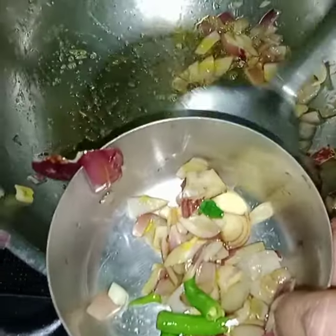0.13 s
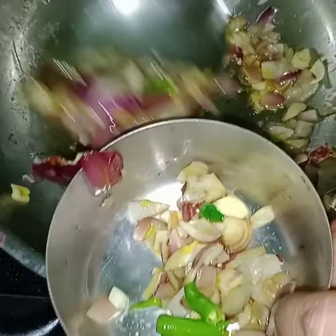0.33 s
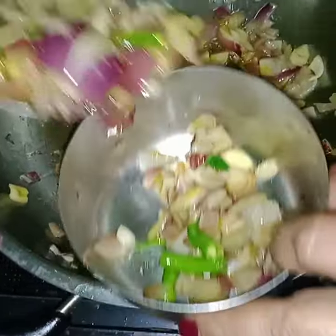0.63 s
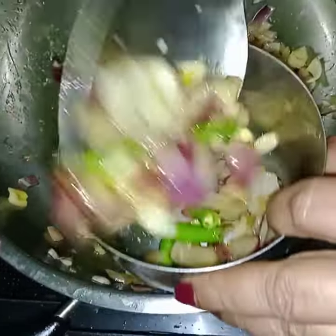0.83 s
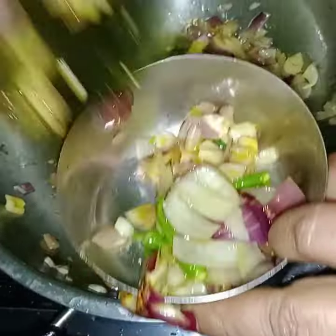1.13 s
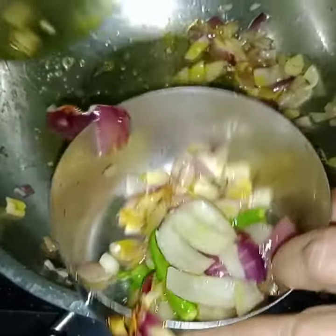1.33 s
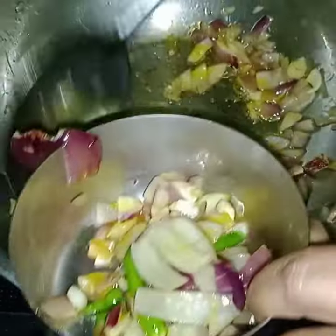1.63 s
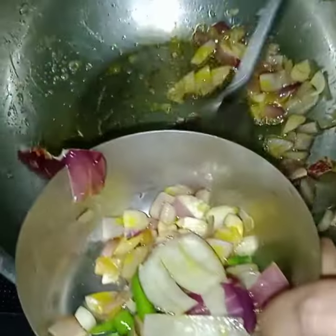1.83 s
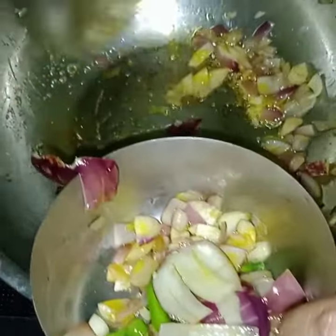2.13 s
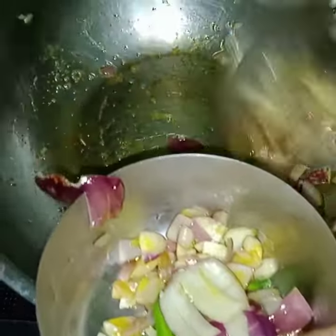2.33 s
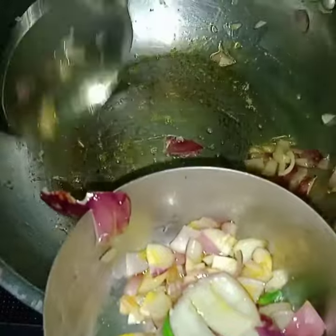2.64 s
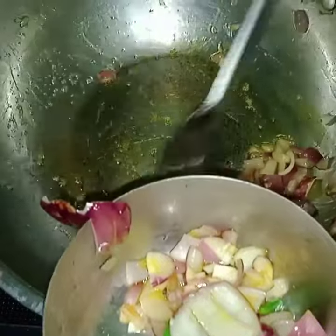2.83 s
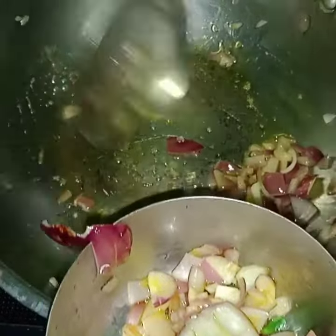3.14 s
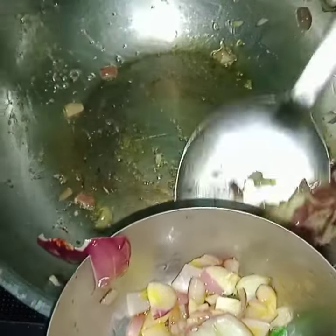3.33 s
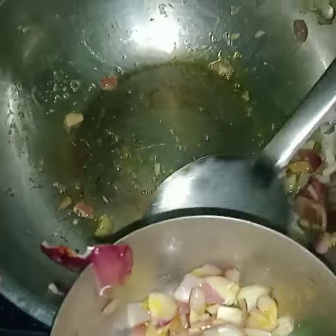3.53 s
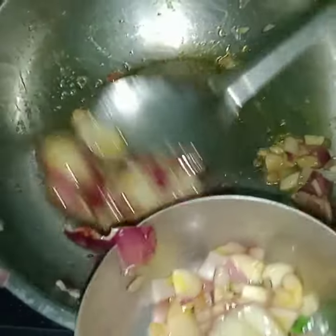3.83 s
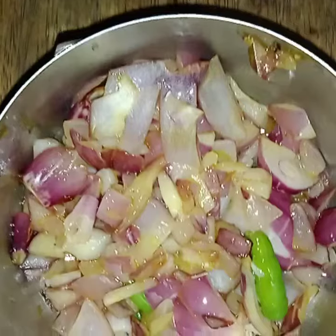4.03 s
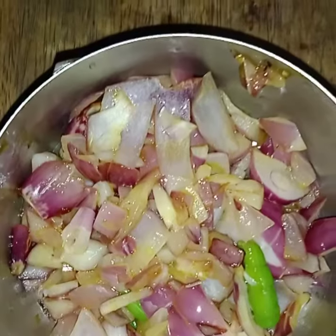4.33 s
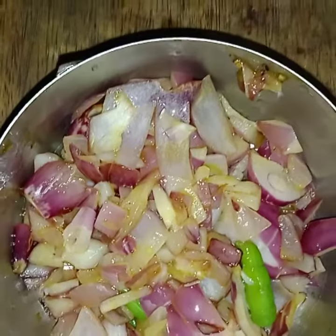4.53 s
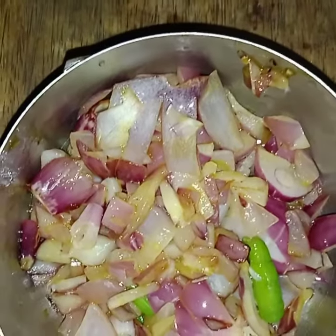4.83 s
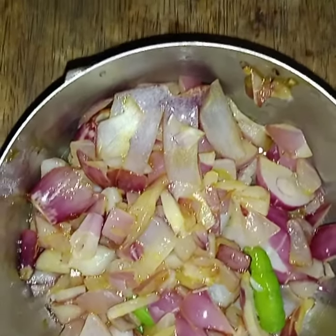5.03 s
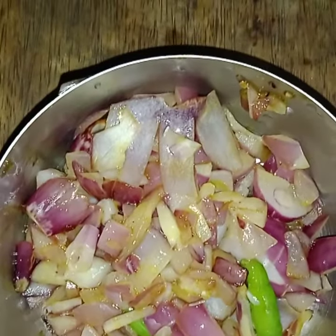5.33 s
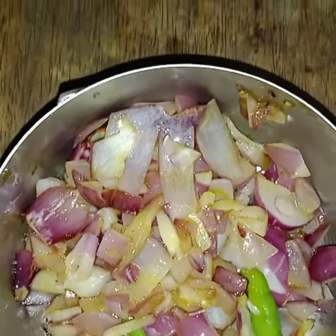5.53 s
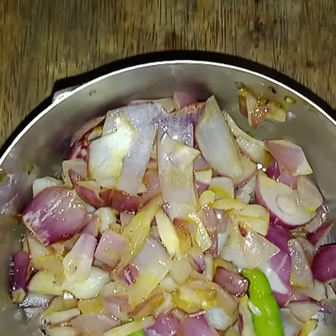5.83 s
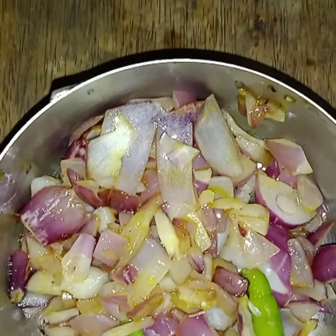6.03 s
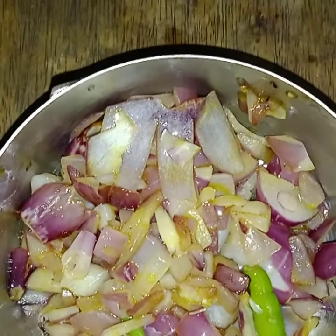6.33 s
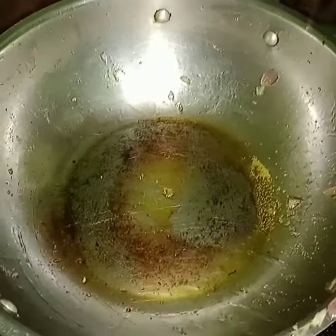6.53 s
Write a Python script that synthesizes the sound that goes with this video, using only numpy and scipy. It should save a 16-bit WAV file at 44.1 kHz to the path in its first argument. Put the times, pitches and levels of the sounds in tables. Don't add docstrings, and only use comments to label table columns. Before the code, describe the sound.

Birds heard from a kitchen near open air, over steady soft hum and hiss. A rising whistle and brief leaf rustle with a soft bump open; four sharp swoops follow. A large cuckoo calls three times, climbing then falling, each louder, the last a piercing peak. Low hoots recur evenly, and harsh chatter bursts in near the end. A phone microphone, thin in bass, catches wall echoes and a short outdoor tail.

```python
import sys
import numpy as np
from scipy import signal
from scipy.io import wavfile
from scipy.ndimage import uniform_filter1d

SR = 44100
rng = np.random.default_rng(int(sys.argv[2]) if len(sys.argv) > 2 else 0)


def generate_wav(signal):
    frames = np.transpose(np.atleast_2d(signal))
    scaled = np.clip(frames, -1, 1) * 32767
    pcm = np.round(scaled).astype(np.int16)
    wavfile.write(sys.argv[1], SR, pcm)


def undo_db(level):
    steps = np.asarray(level, float) / 20
    return 10 ** steps


N = 294147


def evened(x):
    return x / np.sqrt(np.mean(x ** 2) + 1e-20)


def read(points, hz):
    f, value = np.transpose(points)
    return np.interp(np.log(hz + 1), np.log(f + 1), value)


def over_time(points):
    return np.interp(np.arange(N) / SR, *np.transpose(points))


def add(mix, s, sound):
    part = mix[round(s * SR):][:len(sound)]
    part += sound[:len(part)]


def phase(hz):
    return 2 * np.pi * np.cumsum(hz) / SR


def slow(count, size):
    return evened(uniform_filter1d(uniform_filter1d(rng.standard_normal(count), size), size))


def banded(x, low_hz, high_hz):
    return signal.lfilter(*signal.butter(2, [low_hz, high_hz], "band", fs=SR), x)


def unroll(rows, edge_s=0.0025, size=200):
    s, *columns = np.transpose(rows)
    t = np.arange(s[0], s[-1], 1 / SR)
    edges = signal.windows.tukey(len(t), min(1, 2 * edge_s * SR / len(t)))
    smooth = [uniform_filter1d(np.interp(t, s, c), size, mode="nearest") for c in columns]
    return s[0], edges, *smooth


# glide end/share of length, loudest point/share, start level/dB, end level/dB, easing/exponent
EVEN = (0.96, 0.56, -1.2, -0.99, 0.98)
HOOT = (0.83, 0.8, -14.5, -13.5, 2.5)
RISE = (1, 0.8, -14, -25, 1.5)
FADE = (1, 0.05, -0.5, -14, 1.5)
SWELL = (0.54, 0.5, -10, -28.5, 1.5)
RASP = (1, 1.2, 1, -8, 1.5)


def shaped(rows, shape):
    glide_ends, loudest, start_db, end_db, easing = shape
    u = np.linspace(0, 1, num=25)
    swell_db = np.interp(u, [0, np.clip(loudest, .01, .99), 1], [start_db, 0, end_db])
    glide = 1 - np.maximum(1 - u / glide_ends, 0) ** easing
    return [np.column_stack([s + length * u, first + (last - first) * glide, db + swell_db])
            for s, length, first, last, db in rows]


def whistle(notes, second_db, waver, flutter_db, edge_s, third_db=-60, rich_hz=0):
    out = np.zeros(N)
    for rows in notes:
        s, edges, hz, db = unroll(rows, edge_s)
        turn = phase(hz * (1 + waver * slow(len(hz), size=120)))
        rich = np.clip((4700 - hz) / 900, 0, 1) * np.clip((hz - rich_hz) / 700, 0, 1) ** 2
        overtones = undo_db(second_db) * np.sin(2 * turn) + undo_db(third_db) * np.sin(3 * turn)
        level = np.sqrt(2) * undo_db(db + flutter_db * slow(len(hz), size=200))
        add(out, s, level * edges * (np.sin(turn) + rich * overtones))
    return out


def hiss(colour, patchy_db, frames_wide=10, bins_wide=8):
    hz = np.fft.rfftfreq(1024, 1 / SR)
    a, b, patches = rng.standard_normal((N // 256 + 5, 513, 3)).T
    patches = evened(uniform_filter1d(uniform_filter1d(patches, int(bins_wide), 0), int(frames_wide), 1))
    z = (a + 1j * b) * undo_db(read(colour, hz)[:, None] + patchy_db * patches)
    return evened(signal.istft(z, nperseg=1024, noverlap=768)[1][:N])


# f/Hz, density/dB per Hz
AIR = [(25, -21.5), (45, -15), (85, -0.5), (300, -3.5), (700, -7.5), (1500, -9), (3000, -13.5),
       (6000, -17.5), (9300, -28), (10600, -37), (13800, -54.5), (14600, -29), (15700, -25)]


def air():
    return undo_db(-60.5) * hiss(AIR, 1.97)


# t/s, level/dB
CHORUS = [
    (0, -61),
    (1.0, -67.5),
    (2.3, -65.5),
    (4.2, -63.5),
    (5.201, -66.5),
    (5.9, -64.5),
    (6.67, -62.5),
]
# f/Hz, level/dB
CHORUS_COLOUR = [(1500, -11), (2200, -1.5), (2900, 3.5), (4200, -9), (5200, -20.5), (6500, -5.5),
                 (8000, -23)]


def chorus():
    return hiss(CHORUS_COLOUR, 2.5, frames_wide=20, bins_wide=5) * undo_db(over_time(CHORUS) - 1.0)


# t/s, half width/s, level/dB
RUSTLE = [
    (.15, .05, -68.5),
    (.24, 0.078, -62),
    (.35, 0.024, -74),
    (5.72, 0.083, -72),
    (5.9, 0.05, -67.5),
    (6.05, 0.46, -75),
    (6.559, 0.099, -72.5),
]
# f/Hz, density/dB per Hz
RUSTLE_COLOUR = [(4800, -4), (7300, -4), (9800, -17.5), (13000, -22.5), (15100, -16)]


def rustle():
    t = np.arange(N) / SR
    level = 0
    for s, width_s, db in RUSTLE:
        level = level + undo_db(db + 7.0 - 15 * np.minimum(((t - s) / width_s) ** 2, 20))
    grain = undo_db(2.6 * slow(N, size=90))
    return level * hiss([(2500, -39.0)] + RUSTLE_COLOUR, 3.0, frames_wide=2.9) * grain


# t/s, peak level/dB, lowest f/Hz, highest f/Hz, ring/ms
TICKS = [(0.221, -44, 4500, 12000, 2.5), (.243, -37, 4500, 12000, 2.5), (.97, -62, 8000, 15000, 1),
         (.984, -47, 6500, 15000, 1), (1.038, -49, 8200, 14000, 1), (1.148, -56, 8000, 11000, 1),
         (1.159, -53, 4950, 13000, .8), (1.448, -44, 13000, 15600, 4), (1.57, -55, 13270, 15700, 2.7),
         (1.691, -63, 9000, 15000, 3), (4.496, -54, 890, 6000, 1.5), (4.511, -31, 250, 2280, 0.78),
         (4.511, -58, 6000, 13000, 1.5), (4.548, -35, 700, 12000, 1.6), (5.247, -43, 1390, 1970, 7.8),
         (3.667, -47, 1450, 1900, 6), (1.678, -58, 8000, 15000, 2), (1.65, -60, 7500, 15000, 1),
         (5.016, -62, 9000, 15500, 1)]


def ticks():
    out, t = np.zeros(N), np.arange(2000) / SR
    for s, db, low_hz, high_hz, ring_ms in TICKS:
        puff = rng.standard_normal(len(t)) * np.exp(-t * 1000 / ring_ms)
        step = 2.5 * (t < 1.5 / SR)
        puff = banded(puff - step, low_hz, min(high_hz, 16000))
        add(out, s, undo_db(db) * puff / abs(puff).max())
    return out


# t/s, peak level/dB, f/Hz
THUMPS = [
    (0.22, -45, 95),
    (.243, -44, 113),
    (4.512, -45, 150),
]


def thumps():
    out, t = np.zeros(N), np.arange(2000) / SR
    for s, db, hz in THUMPS:
        add(out, s, -undo_db(db) * np.sin(2 * np.pi * hz * t) * np.exp(-t / 0.0059))
    return out


def faint_birds(count=130):
    when, length, pitch, glide, loud = rng.random((count, 5)).T
    hz = 1700 * 4 ** pitch
    return np.column_stack([when * (N / SR - .1), 0.044 + 0.083 * length, hz * (1.04 - .14 * glide), hz,
                            -77 + 5 * (loud - pitch)])


# t/s, length/s, first f/Hz, last f/Hz, level/dB
DISTANT = [(.355, 0.15, 3640, 3435, -57), (.5, 0.1, 2994, 2990, -60), (1.2, .085, 1700, 1690, -61),
           (.716, 0.025, 4900, 5600, -59), (.815, .02, 5150, 5550, -62), (.82, 0.043, 2760, 2890, -64),
           (.775, 0.032, 4400, 4900, -67), (.85, 0.03, 5900, 6400, -67), (.945, .025, 4500, 5100, -70),
           (1.63, .015, 4500, 4900, -64), (1.975, .015, 4600, 4900, -67), (.5, 0.053, 5800, 6140, -70),
           (3.38, 0.072, 3240, 4370, -68), (3.695, 0.056, 4050, 4130, -54.5),
           (4.405, 0.065, 2408, 2660, -59.5), (4.85, 0.047, 2734, 2788, -65.5),
           (4.96, 0.043, 6000, 6500, -64.5), (5.68, 0.12, 2410, 3000, -59.5),
           (5.845, 0.021, 6480, 6500, -61), (6.198, 0.022, 6300, 5800, -58), (2.39, 0.06, 4300, 4300, -72),
           (2.495, 0.028, 1900, 2250, -63.5), (3.42, .04, 4380, 4420, -68), (4.25, 0.1, 2800, 2854, -65),
           (6.03, 0.023, 2500, 2440, -59), (6.16, 0.023, 7300, 7250, -64), (6.31, 0.03, 2740, 2650, -59),
           (6.51, .022, 8350, 8400, -70), (6.595, .05, 6150, 6050, -70)]
FADING = [(.122, 0.13, 4195, 4200, -49), (.262, 0.13, 3027, 2970, -49.5), (.332, 0.093, 4640, 4710, -59.5),
          (2.29, 0.065, 2960, 2830, -59), (2.29, 0.057, 6060, 5770, -61), (2.6, 0.25, 2890, 2700, -59.5),
          (3.18, 0.15, 2810, 2830, -59), (3.42, .08, 1890, 1630, -61.5), (4.556, 0.062, 4730, 4700, -58.5),
          (4.582, 0.1, 3300, 3170, -52), (4.63, .05, 3990, 4400, -61), (6.38, 0.084, 2035, 2270, -50.5)]
SWELLING = [
    (.742, .045, 2900, 4250, -63),
    (1.56, 0.063, 2600, 2832, -41.5),
    (3.33, 0.16, 1954, 2655, -54.5),
    (3.92, 0.11, 2490, 2710, -47.5),
    (4.42, 0.141, 2570, 2855, -40.5),
    (4.85, 0.099, 5350, 5750, -57),
]


def distant_birds():
    notes = shaped(DISTANT, EVEN) + shaped(FADING, FADE) + shaped(SWELLING, SWELL)
    return whistle(notes + shaped(faint_birds(), EVEN), -36, .004, 4.0, .012)


# t/s, length/s, first f/Hz, last f/Hz, level/dB
FAR_LOW = [
    (0, 0.36, 1494, 1512, -70.5),
    (.33, 0.32, 1520, 1196, -66),
    (.55, 0.16, 720, 682, -69.5),
    (.92, 0.034, 1047, 1100, -59.5),
    (2.48, 0.22, 1235, 1386, -64),
    (2.7, 0.19, 1376, 1298, -62.5),
    (5.42, .08, 535, 521, -58),
    (5.95, 0.35, 1572, 1450, -70.5),
    (6.2, 0.23, 948, 880, -67.5),
    (6.3, 0.4, 1468, 1397, -71),
]
FAR_COOS = [
    (2.79, 0.17, 1006, 975, -64),
    (5.09, 0.068, 1000, 960, -59),
    (5.95, 0.091, 955, 930, -53.5),
    (6.5, 0.09, 880, 900, -56),
]


def far_cuckoos_and_doves():
    return whistle(shaped(FAR_LOW, EVEN) + shaped(FAR_COOS, FADE), -43, 0.011, 2.4, 0.012)


# t/s, length/s, lowest f/Hz, level/dB, stroke height/Hz
RASPS = [(0.87, 0.0403, 5000, -71, 1040), (.735, 0.058, 2782, -55, 1600), (0.85, 0.02, 2100, -53, 800),
         (3.05, .04, 2000, -61, 1400), (3.17, .035, 3300, -66, 500), (3.32, .04, 4000, -67, 400),
         (0.799, 0.068, 4400, -67, 1505), (1.2, .2, 2560, -55, 330), (2.969, 0.11, 3200, -56, 1100),
         (2.6, 0.085, 4100, -58, 700), (4.12, 0.21, 3930, -61, 720), (5.45, 0.12, 2800, -47.5, 1100),
         (5.24, .1, 2700, -63, 1600), (5.82, .14, 3900, -51, 1300), (5.66, .11, 5400, -55, 1700),
         (0.13, .1, 3900, -54, 650), (5.83, .12, 3700, -48, 740), (5.44, 0.087, 2100, -57, 350),
         (5.668, 0.13, 4920, -40.5, 503), (5.71, 0.115, 3500, -57, 1200), (5.46, .1, 3500, -52, 900),
         (5.815, 0.038, 3200, -47, 1640), (5.838, .068, 3200, -46, 860), (5.9, 0.044, 3000, -43.5, 1500),
         (5.876, 0.23, 7350, -61.5, 400), (6.066, 0.036, 3000, -42, 320), (6.116, .04, 3200, -47, 300),
         (6.7, 0.14, 2800, -46.5, 349), (6.11, .16, 3200, -52, 1300), (6.4, 0.15, 4320, -60, 1300)]
# t/s, length/s, first lowest f/Hz, last lowest f/Hz, level/dB
SLIDES = [(1.85, 0.19, 2505, 2347, -55), (2.365, 0.065, 2880, 4050, -60.5), (3.4, 0.064, 3520, 4103, -71),
          (3.655, 0.066, 3580, 3930, -52), (3.99, 0.11, 4330, 3840, -51), (4.59, 0.1, 2850, 3500, -55),
          (5.085, 0.027, 2330, 2820, -61), (5.945, 0.15, 5000, 4100, -50), (5.6, 0.12, 4090, 3900, -52.5),
          (5.648, 0.053, 7060, 5300, -42), (5.655, .04, 7000, 6800, -48), (.75, 0.047, 3500, 3900, -56),
          (.735, 0.043, 2750, 3700, -55), (.83, .07, 5350, 5600, -68), (5.66, 0.063, 6030, 5500, -48),
          (5.95, .07, 3200, 3200, -52), (1.5, 0.079, 1900, 2500, -52), (6.55, 0.12, 4610, 4950, -45)]


def warbles():
    level = shaped([(s, length, hz, hz, db) for s, length, hz, db, _ in RASPS], RASP)
    level = [np.column_stack([p, np.full(len(p), row[-1])]) for p, row in zip(level, RASPS)]
    return level + [np.column_stack([p, .14 * p[:, 1]]) for p in shaped(SLIDES, RASP)]


def rasps(octave_db=-27, twelfth_db=-30):
    out, strokes_hz, hoarse_hz, top_db = np.zeros(N), 135, 190, -7
    for rows in warbles():
        s, edges, hz, db, height_hz = unroll(rows, edge_s=.018)
        rate_hz = strokes_hz * undo_db(3.5 * slow(len(hz), size=200))
        stroke = (rng.random() + np.cumsum(rate_hz) / SR) % 1
        lift = (1 - stroke) ** 2.2 * np.clip(.85 + .15 * slow(len(hz), size=300), .3, 1.1)
        turn = np.exp(1j * phase(hz + height_hz * lift))
        hoarse = signal.butter(2, hoarse_hz / 2, fs=SR)
        a, b = signal.lfilter(*hoarse, rng.standard_normal((2, len(hz))))
        stack = turn + (undo_db(octave_db) * turn ** 2 + undo_db(twelfth_db) * turn ** 3) * (hz < 5400)
        swell = np.sin(np.pi * stroke ** 0.5) ** .5 * undo_db(top_db * lift)
        tone = swell * (a + 1j * b) * stack
        add(out, s, undo_db(db) * edges * evened(tone.real))
    return out


# t/s, peak level/dB, f/Hz
HIGH_BEATS = [(5.6588, -46, 5600), (5.6743, -38.5, 5250), (5.6888, -30.5, 5310), (5.7117, -28, 5220),
              (5.7312, -33, 5074), (5.7456, -26.5, 4990), (5.7751, -35, 4980), (5.8, -44, 5020),
              (5.8215, -44, 4960), (5.9646, -43, 5076), (6.006, -46, 5040)]
MIDDLE_BEATS = [(5.699, -48, 2720), (5.716, -45, 2720), (5.73, -47, 2800), (5.742, -44, 2850),
                (5.755, -48, 2910), (5.79, -43, 2950), (5.836, -40, 3950), (5.8357, -38, 3810),
                (5.8585, -35, 3260), (5.8788, -35, 3740), (5.8927, -30.5, 3360), (5.9189, -33, 3190)]
LOW_BEATS = [(6.0696, -39, 2920), (6.0908, -35.5, 2910), (6.1208, -35, 2950), (6.1227, -35, 2855),
             (6.1706, -32, 2885), (6.136, -38, 2880), (6.184, -38, 2880), (6.198, -40, 2850),
             (6.215, -38, 2890), (6.226, -39, 2850), (6.24, -41, 2880), (6.2529, -39.5, 2880),
             (6.27, -44, 2900), (2.975, -54, 3280), (2.985, -54, 3700), (3.0, -53, 4300),
             (3.012, -53, 4600), (3.03, -56, 4380), (3.055, -51, 3370), (3.07, -51, 2950)]


def beats(length_s=.01, drop=.05, less_db=-1.5):
    out, u = np.zeros(N), np.linspace(0, 1, int(length_s * SR))
    for s, db, hz in HIGH_BEATS + MIDDLE_BEATS + LOW_BEATS:
        turn = phase(hz * (1 + drop * ((1 - u) ** 2 - .3)))
        add(out, s, undo_db(db + less_db) * np.sin(np.pi * u ** 0.83) ** 2 * np.sin(turn))
    return out


# t/s, level/dB
TRILL = [
    (1.174, -53),
    (1.192, -47.5),
    (1.208, -42),
    (1.225, -45),
]


def trill(low_hz=3800, rim_hz=1100, length_s=0.0105):
    out, u = np.zeros(N), np.linspace(-1, 1, int(length_s * SR))
    turn = phase(low_hz + rim_hz * u ** 4)
    for s, db in TRILL:
        add(out, s, undo_db(db) * signal.windows.tukey(len(u), .3) * (np.sin(turn) + 0.16 * np.sin(2 * turn)))
    return out


# t/s, length/s, first f/Hz, last f/Hz, level/dB
WHISTLES = [(.6, .125, 2985, 3000, -60), (1.32, 0.024, 3100, 3970, -52), (1.345, .03, 4030, 3940, -57.5),
            (1.65, 0.07, 4240, 4500, -49), (6.348, 0.11, 2290, 2875, -47), (6.36, 0.12, 2050, 2530, -55),
            (6.455, 0.0754, 2903, 2730, -47), (6.9, .035, 3850, 4400, -65),
            (6.415, 0.0327, 3950, 4650, -58), (6.447, .022, 5100, 3200, -54),
            (6.478, .034, 3250, 4450, -54), (0.82, .02, 3850, 4250, -66), (.757, .04, 4130, 4320, -51),
            (.885, .02, 6050, 5150, -58), (.904, .014, 5150, 5450, -58), (6.44, .03, 5500, 6100, -62),
            (5.09, 0.017, 2750, 2850, -55.5), (3.3, 0.065, 1600, 2200, -64), (3.37, 0.045, 2900, 4900, -68),
            (2.36, .045, 3200, 4100, -66), (3.1, .075, 1850, 1950, -69.5),
            (6.545, 0.022, 4650, 5050, -49.5), (6.655, 0.016, 3640, 3740, -55)]
RISERS = [
    (.02, 0.069, 2085, 2870, -48),
    (2.525, 0.059, 2375, 2824, -45),
    (3.56, .095, 2034, 2920, -47.5),
]


def near_whistles():
    return whistle(shaped(WHISTLES, EVEN) + shaped(RISERS, RISE), -33.0, 0.0018, 3.5, 0.003)


# t/s, pitch factor/1, level/dB
SWOOPS = [
    (0.969, 1.007, -37),
    (1.317, 1, -36.5),
    (1.646, 1.005, -36.5),
    (1.991, 1.007, -37.5),
]
# t/s, f/Hz, level/dB
ARCH = [(-.004, 3700, -27), (.004, 5600, -17), (.013, 6700, -23), (.03, 7050, -24), (.046, 7060, -27),
        (.051, 6300, -16), (.056, 3950, -22)]
SLIDE = [(.056, 3830, -14), (.072, 3620, -19), (.088, 3070, -9), (0.099, 2770, 1), (.107, 2500, -13),
         (.122, 2070, -15), (.148, 1780, -11), (.185, 1730, -15)]
# t/s, f/Hz, level/dB
BEND = [
    (.993, 3540, -52),
    (1.012, 3490, -53),
    (1.028, 3050, -50),
    (1.036, 2850, -40),
    (1.046, 2600, -39),
    (1.056, 2350, -50),
    (1.082, 1660, -50),
]


def swoops():
    parts = [np.array(part) * [1, factor, 1] + [s, 0, db]
             for s, factor, db in SWOOPS for part in (ARCH, SLIDE)]
    return whistle(parts, -11, .004, 3.5, .003, -42, 2520) + whistle([BEND], -8, .002, 2, .003, -20, 2600)


# t/s, length/s, first f/Hz, last f/Hz, level/dB
STEADY = [
    (1.245, .08, 3120, 3090, -38.5),
    (6.563, 0.059, 5130, 5135, -45),
]


def steady_whistles():
    return whistle(shaped(STEADY, EVEN), -36, .001, .6, .003)


# t/s, length/s, first f/Hz, last f/Hz, level/dB
HOOTS = [
    (1.712, 0.057, 767, 872, -39.5),
    (2.955, 0.056, 784, 870, -38.5),
    (4.12, 0.064, 774, 860, -38.5),
    (5.295, 0.052, 780, 904, -41),
    (6.56, 0.064, 787, 879, -41.5),
]


def barbet():
    return whistle(shaped(HOOTS, HOOT), -27.0, 0.0027, 1.5, 0.013)


# t/s, f/Hz, level/dB
CUCKOOS = [
    [(1.535, 1134, -53.5), (1.65, 1073, -46), (1.745, 1099, -46), (1.85, 1338, -47), (1.9, 1375, -44.5),
     (1.935, 1342, -39.5), (1.965, 1145, -44), (2.005, 949, -48), (2.04, 828, -55.5)],
    [(3.668, 1223, -47), (3.766, 1163, -45), (3.89, 1205, -41.5), (3.985, 1462, -32.5), (4.022, 1500, -29),
     (4.058, 1465, -37.5), (4.095, 1255, -39), (4.14, 1076, -40), (4.19, 880, -48)],
    [(5.252, 1388, -42.5), (5.33, 1309, -41), (5.44, 1309, -38.5), (5.565, 1608, -19), (5.594, 1618, -17.5),
     (5.625, 1545, -24), (5.665, 1272, -35.5), (5.75, 1074, -41), (5.79, 859, -45)],
]
OVERTONES = [
    [-50, -80, -60, -51, -64, -74, -68, -74],
    [-49, -66, -48, -52, -60, -66, -65, -66],
    [-48, -70, -52, -51, -70, -58, -52, -72],
]
# f/Hz, level/dB
THROAT = [(2650, -9), (3200, 0), (4850, -26), (5150, -5), (8100, 0), (8600, -9), (9400, -5), (10300, -28),
          (11100, -17), (11800, -32), (13000, -30)]


def cuckoo(follow=0.21):
    out, bright = np.zeros((2, N))
    for call, overtones in zip(CUCKOOS, OVERTONES):
        s, edges, hz, db = unroll(call, edge_s=0.0049, size=400)
        hz = uniform_filter1d(hz, size=700, mode="nearest")
        turn = phase(hz * (1 + 0.0033 * slow(len(hz), size=200)))
        after_top = np.arange(len(hz)) > np.argmax(hz * edges ** 9)
        closing_db = 90 * np.minimum(hz / hz.max() - .93, 0) * after_top
        over = 0
        for k, overtone_db in enumerate(overtones, 2):
            fading = .75 + .55 * slow(len(hz), size=400)
            over = over + undo_db(overtone_db + read(THROAT, k * hz)) * fading * np.sin(k * turn)
        add(out, s, np.sqrt(2) * edges * undo_db(db + 1.08 * slow(len(hz), size=260)) * np.sin(turn))
        add(bright, s, np.sqrt(2) * edges * undo_db(follow * db + closing_db) * over)
    return out, bright


# t/s, level/dB
FACING = [
    (2.0, -6),
    (4.0, -6.5),
    (5.6, -14.5),
    (5.7, -7),
]


def toward_walls(big):
    return undo_db(over_time(FACING)) * big


# delay/s, level/dB
ECHOES = [
    (0.02, -18),
    (0.037, -22),
]


def wall_echoes(x):
    out = np.zeros(N)
    for delay_s, db in ECHOES:
        add(out, delay_s, undo_db(db) * x)
    return out


# f/Hz, t60/s
YARD = [(500, 0.21), (1500, 0.41), (3000, 0.27), (5000, 0.3), (6500, 0.43), (12000, 0.11)]


def yard(x, first_s=.012, late_db=-19, late_times=2.97):
    taps = np.zeros(SR)
    at = np.arange(int(first_s * SR), SR - 20, 20)
    taps[at + rng.integers(0, 20, len(at))] = rng.choice([-1., 1.], len(at))
    hz, t, z = signal.stft(taps, SR, nperseg=256)
    fall_db = -60 * t / read(YARD, hz)[:, None]
    decay = undo_db(fall_db) + undo_db(late_db + fall_db / late_times)
    tail = signal.istft(z * decay, SR, nperseg=256)[1]
    before = np.arange(N) < .919 * SR
    parts = [x * before, x * ~before]
    early, later = signal.fftconvolve(parts, [tail / np.linalg.norm(tail)], axes=1)[:, :N]
    return early * before + later


def scene():
    far = distant_birds() + far_cuckoos_and_doves()
    hoarse = rasps() + undo_db(2.5) * beats()
    small = swoops() + near_whistles() + trill()
    steady, hoots = steady_whistles(), barbet()
    big, bright = cuckoo()
    near = steady + big + bright + hoots + small + undo_db(-0.5) * far + undo_db(-4.5) * hoarse
    near = near + wall_echoes(small + far + hoarse)
    to_yard = toward_walls(big) + undo_db(-5.5) * bright + undo_db(-10.5) * hoots + undo_db(-16.5) * steady
    to_yard = to_yard + undo_db(-6) * small + undo_db(-5.0) * far + undo_db(-8.5) * hoarse
    return (near + yard(to_yard) + chorus() + air() + rustle() + ticks() + thumps())[None]


def roll_off(x):
    return signal.sosfilt(signal.butter(12, 16370, fs=SR, output="sos"), x)


def record(dry):
    thin = signal.lfilter(*signal.butter(2, 55, "high", fs=SR), dry)
    edge = signal.firwin(3001, 15790, window=("kaiser", 9), fs=SR)
    mix = signal.oaconvolve(thin, edge[None], "same")
    return roll_off(mix)


dry = scene()
out = record(dry)
generate_wav(out)
```